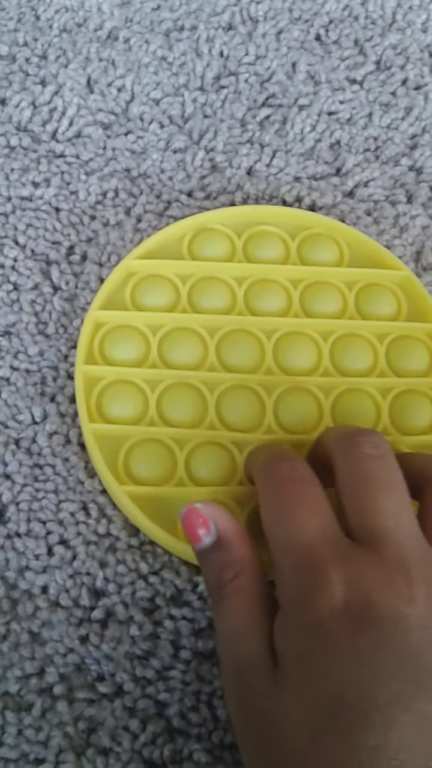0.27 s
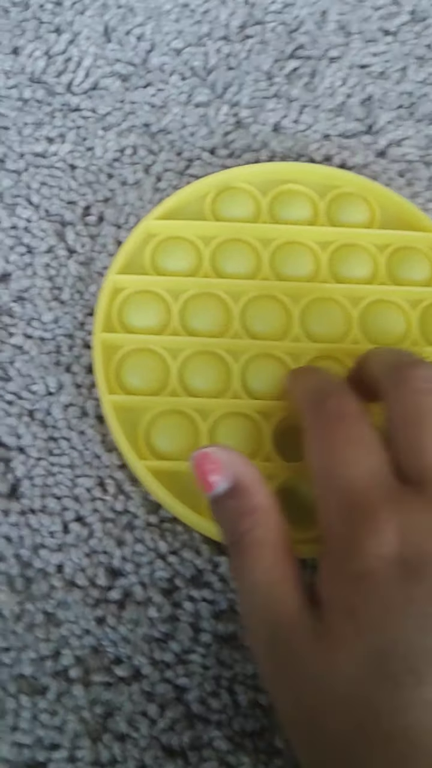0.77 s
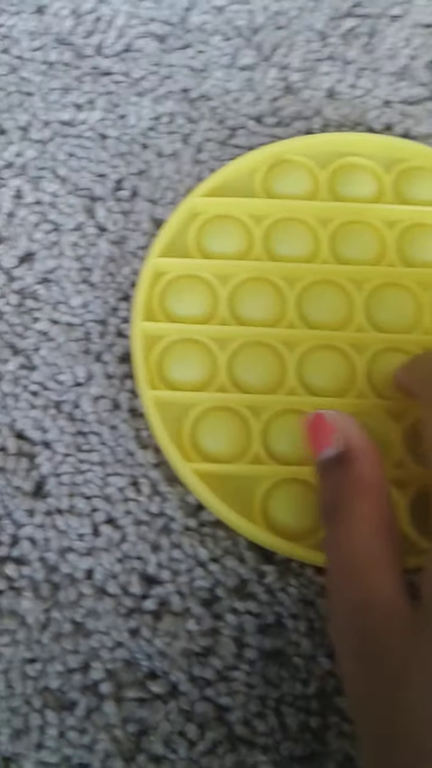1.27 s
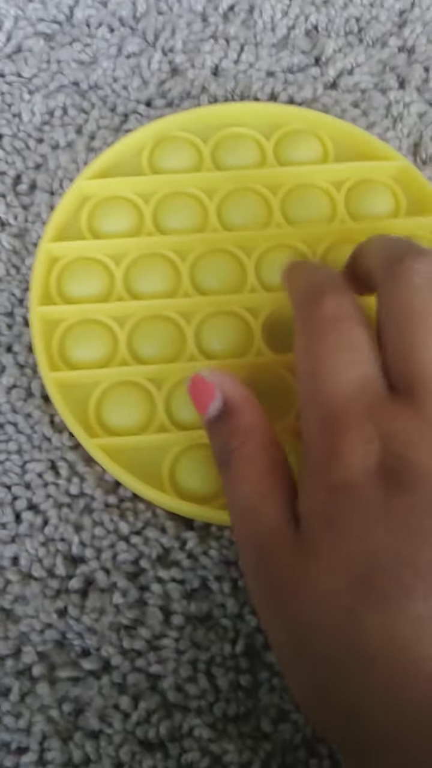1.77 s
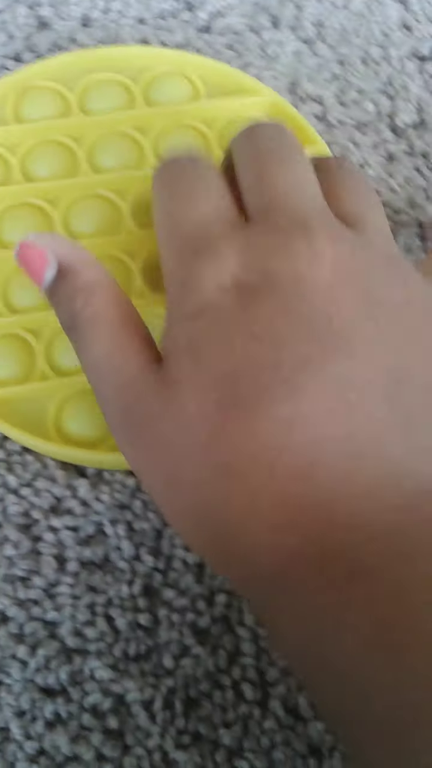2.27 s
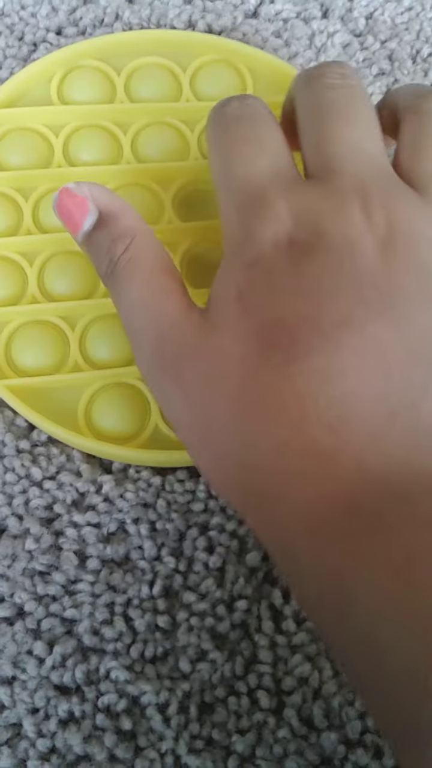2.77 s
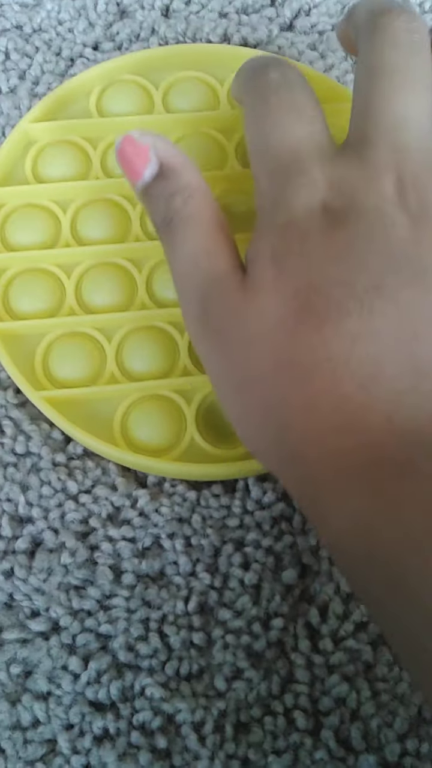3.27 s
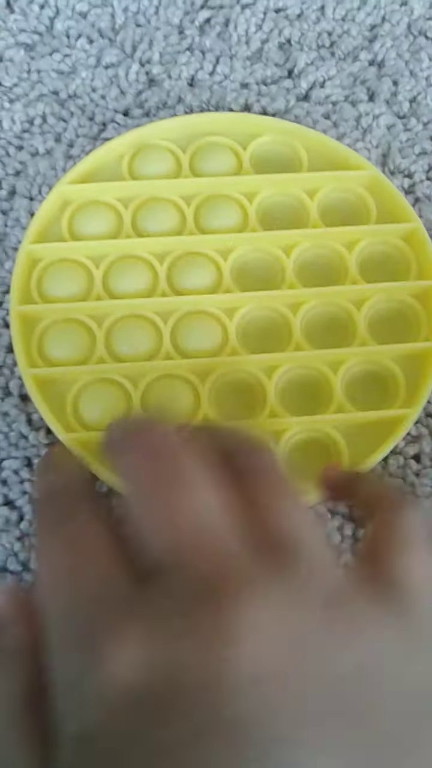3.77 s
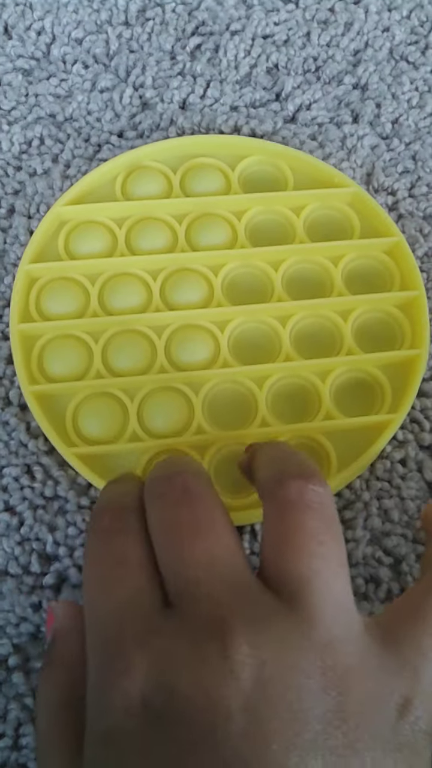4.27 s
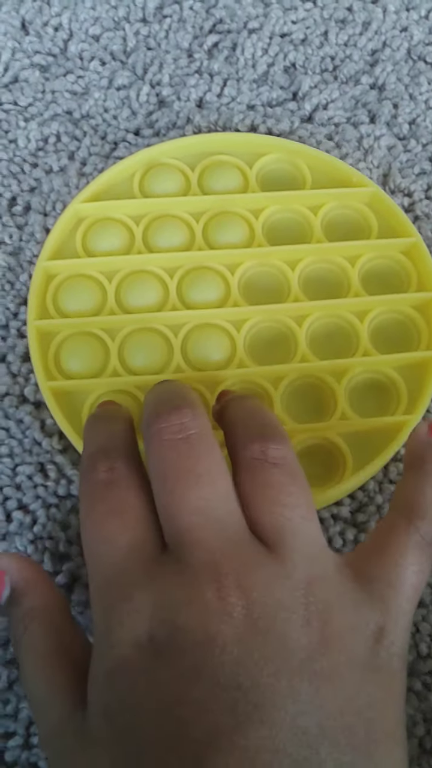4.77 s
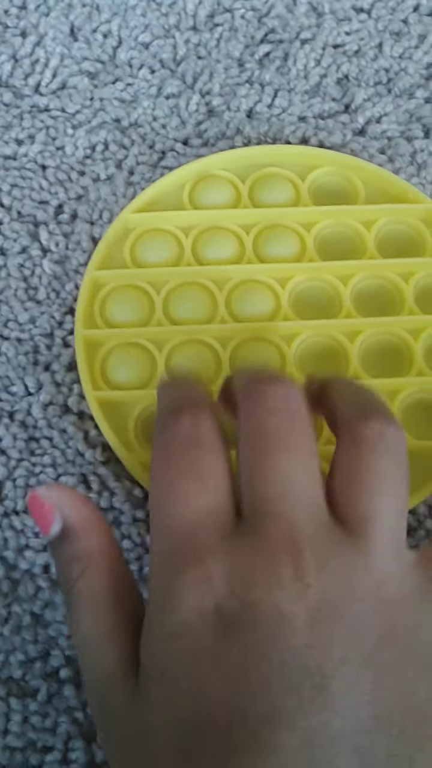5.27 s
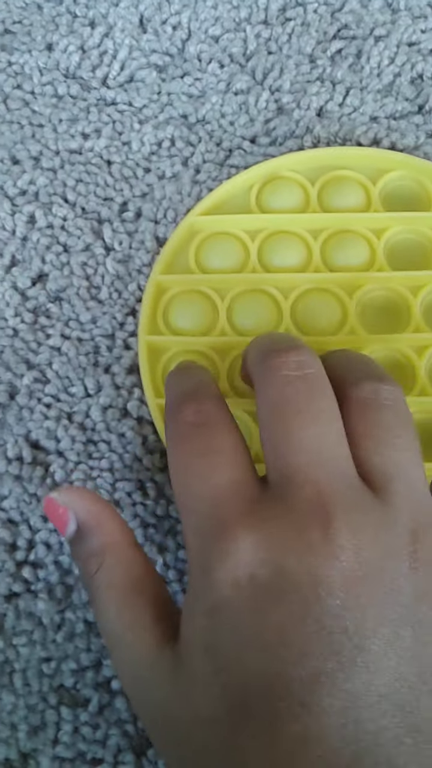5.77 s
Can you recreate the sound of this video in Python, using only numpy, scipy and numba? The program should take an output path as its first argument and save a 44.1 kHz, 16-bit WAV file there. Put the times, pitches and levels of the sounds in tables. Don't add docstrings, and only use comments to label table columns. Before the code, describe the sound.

Silicone bubbles snap inward in seven quick presses, sharp hollow pops over faint low rumble, skin hissing and ticking on rubber in a small room.

```python
import sys
import numpy as np
from scipy import signal
from scipy.io import wavfile
from scipy.ndimage import uniform_filter1d
from numba import njit

SR = 44100
rng = np.random.default_rng(int(sys.argv[2]) if len(sys.argv) > 2 else 0)


def ratio_of_db(decibels):
    return 10 ** (np.asarray(decibels, float) / 20)


def log_audio(samples):
    frames = np.atleast_2d(samples).T
    limited = np.clip(frames, -1, 1)
    pcm = np.round(limited * 32767).astype(np.int16)
    wavfile.write(sys.argv[1], SR, pcm)


N = 265923

# (time [s], level [dB])
RUMBLE_LEVEL = [
    (0, -55.5),
    (.4, -50),
    (1.0, -47.5),
    (1.3, -53),
    (1.7, -54),
    (1.8, -66),
    (2.6, -65.5),
    (4.0, -61.5),
    (6.03, -66),
]
# (time [s], lift [dB])
RUMBLE_SURGES = [(0.131, 7.5), (.27, 5), (.46, 2), (.55, 8), (0.769, 11.5), (.89, 3), (1.079, 5),
                 (1.18, 0.5), (1.6, 7), (2.029, 10), (2.25, 16), (3.01, 10), (3.211, 9), (3.77, 8),
                 (4.75, 3.5), (5.15, 10.5)]
# (frequency [Hz], width [Hz], level [dB])
RUMBLE_BANDS = [(115.5, 25, 0), (153.7, 17, -10.5), (86.9, 30, -11.5), (55.13, 20, -31)]
# (frequency [Hz], density [dB per Hz])
AIR_SPECTRUM = [(198, -15), (270, -15), (434, -21.5), (560, -16), (760, -27.5), (1540, -34), (2540, -41.5),
                (4400, -51.5)]
# (frequency [Hz], width [Hz], rms level [dB])
HOUSE_DRONES = [(47.9, 9.8, -81.5), (61.3, 22, -72), (88.2, 40, -69.5), (180.5, 50, -71.5),
                (552.5, 85, -73)]
# (start [s], length [s], hiss [dB], hiss centre [Hz], dull scrape [dB])
SKIN_SLIDES = [(0.0, .31, -60, 6940, -84), (0.325, 0.24, -70, 6260, -70), (0.628, 0.095, -64, 7310, -74),
               (0.703, 0.18, -60.5, 6300, -80), (0.823, 0.11, -61, 7160, -80),
               (0.897, 0.3, -54.5, 7690, -77), (1.218, 0.052, -72, 7620, -88), (1.42, .25, -66, 6444, -91),
               (1.783, 0.035, -76, 7500, -88.5), (1.936, 0.14, -57, 7460, -83),
               (2.028, .33, -58, 6350, -79.5), (2.616, 0.17, -81, 7275, -94),
               (2.818, 0.18, -66.5, 6506, -84), (3.178, 0.049, -77, 6500, -78),
               (3.288, 0.28, -66, 6500, -85), (3.609, 0.29, -47.5, 6300, -58.5),
               (3.85, .2, -74.5, 6500, -78.5), (4.043, 0.1876, -72, 5997, -75.5),
               (4.736, 0.071, -77.5, 7600, -87), (4.873, 0.21, -78, 6500, -86),
               (5.086, 0.1126, -70, 6000, -68), (5.211, .07, -69, 7500, -95), (5.525, 0.23, -83, 6220, -81),
               (5.88, 0.47, -73.5, 6540, -87)]
# (time [s], peak [dB], frequency [Hz], top-end spit [dB])
SKIN_TICKS = [(0.0493, -58, 8550, -22), (0.0642, -52.5, 6900, -30), (0.0867, -70, 7420, -24),
              (0.1062, -58, 7870, -24.5), (0.1262, -50, 6800, -28), (0.357, -50.5, 8000, -28),
              (0.4759, -40, 6300, -14), (0.7237, -50, 7100, -36), (0.839, -45, 8200, -26),
              (1.2341, -62, 7500, -26), (1.7923, -65, 8480, -20), (1.8043, -71, 7330, -15),
              (1.8185, -52.5, 7760, -18), (1.9645, -47.5, 7090, -24), (2.6718, -67, 6750, -17.5),
              (3.5558, -63.5, 5870, -27.5), (4.4308, -62.5, 6890, -17), (4.895, -52.5, 7740, -32),
              (4.9062, -61, 6513, -19), (4.96, -66, 7500, -26.5), (4.995, -68, 6800, -25),
              (5.228, -49, 6570, -13), (5.2764, -64, 6170, -17)]
# (time [s], level [dB], centre [Hz])
PRESS_RUSTLES = [(.35, -51.5, 1600), (1.57, -51.5, 1725), (2.211, -51, 2030), (2.949, -56, 1900),
                 (3.48, -80, 2000), (4.48, -61.5, 1500), (5.11, -67, 1450)]
# (time [s], peak [dB], dome [Hz], air pocket [dB], upper modes [dB])
DOME_POPS = [(0.33829, -35.8, 959, -10, -30), (0.34312, -16.9, 1012, -5, -12),
             (0.34872, -20.2, 1030, -3, -6), (0.35617, -19.7, 956, -3, -10), (1.51839, -33.6, 1015, 5, -40),
             (1.52826, -28.6, 1151, 15, -40), (1.53888, -13.7, 1099, -9, -19),
             (1.54153, -10.9, 1091, -7, -17), (1.5588, -12.8, 1116, -11, -18),
             (2.18528, -34.4, 890, 4, -40), (2.18795, -33.2, 780, 15, -35),
             (2.19314, -14.4, 1170, -10, -14), (2.20071, -12.5, 1138, -9, -15),
             (2.21837, -19.1, 994, -7, -18), (2.21929, -12.4, 1139, -7, -15),
             (2.92477, -17.4, 1174, -7, -15), (2.93472, -28.7, 1073, -1, -40),
             (2.93721, -9.9, 1169, -4, -7), (3.45224, -35.3, 1267, 10, -40), (3.47261, -18.4, 1271, -1, -8),
             (4.4324, -40.4, 1141, 15, -39), (4.46957, -20.1, 850, -17, -40),
             (5.10144, -20.1, 1056, -6, -13), (5.10742, -25.0, 1082, -6, -10)]
# (from [s], dome ring [turns], air pocket [Hz], 2nd mode [Hz], 3rd mode [Hz])
HAND_PRESSES = [
    (0.3, 3.34, 480, 1760, 3000),
    (1.5, 2.49, 370, 2320, 3450),
    (2.1, 2.63, 450, 2400, 3640),
    (2.9, 2.87, 450, 2540, 3060),
    (3.4, 3.12, 420, 2620, 3600),
    (4.4, 1.04, 340, 1850, 3740),
    (5.0, 2.64, 480, 1720, 3080),
]
# (tearing [dB], its treble [dB], treble centre [Hz], share sent to room [dB], lift of upper modes [dB])
FOLD_TEARS = [(-14, -27, 5270, -0.5, 3), (-18.5, -36.5, 6650, -0.5, 0.5), (-18, -28.5, 6070, -1.5, 2),
              (-19, -40, 6500, 0.5, 5.5), (-17.5, -41, 6300, -4.5, 6.5), (-14.5, -42, 6600, 2, 3.5),
              (-15.5, -27.5, 5500, 0, -4.5)]
THIRD_MODE_DB = [-3, -12.5, -7.5, -12.5, -9, 3, -3]
# (frequency [Hz], width [Hz], level [dB])
TEAR_COLOUR = [(611, 250, 11), (1690, 440, 6.5), (2475, 390, 0.5), (3610, 650, -11)]
FOLD_GRIT = rng.standard_normal((len(DOME_POPS), 800))
# (delay [ms], level [dB])
ROOM_ECHOES = [(4.5, -27), (13.6, -13.5), (14.8, -16.5), (18.3, -30.5), (22, -28.5)]
# (frequency [Hz], width [Hz], 60 dB decay [s], level [dB])
ROOM_TAIL = [(280.7, 75, 0.39, -40), (424.6, 250, 0.28, -41.5), (600, 220, 0.25, -33),
             (927, 570, .3, -38.5), (1112, 200, 0.39, -44.5), (1600, 510, 0.26, -36), (2000, 630, 0.3, -36),
             (2610, 900, 0.15, -44), (3474, 900, 0.51, -46), (6500, 3300, 0.35, -32.5)]
# (time [s], rms level [dB], frequency [Hz], width [Hz], 60 dB decay [s])
FAR_RINGS = [(3.80, -55.5, 264, 42, 0.39), (3.945, -60.5, 693, 74, 0.15), (5.37, -62.5, 958, 77, 0.61),
             (3.6, -69.5, 960, 55, .4), (5.36, -76, 1430, 54, 0.79), (5.39, -77, 1100, 70, 0.4),
             (5.68, -65, 565, 120, 0.95), (5.28, -65, 585, 65, .8), (5.75, -70.5, 1500, 560, 1.2),
             (5.82, -67, 900, 300, 0.7), (2.4, -63, 230, 17.8, 0.45), (5.36, -72.5, 1600, 2000, 0.65),
             (4.02, -66.5, 300, 40, 1.2), (4.4, -66, 257, 67, 0.46), (5.08, -54, 214, 72, 0.29)]


def level(x, db):
    return x * ratio_of_db(db) / np.sqrt(np.mean(x ** 2))


@njit
def svf(x, hz, width):
    y, low_state = np.empty(len(x)), 0.
    band_state = 0.
    for i in range(len(x)):
        g = np.tan(np.pi * hz[i] / SR)
        k = width / hz[i]
        v = (band_state + g * (x[i] - low_state)) / (1 + g * (g + k))
        band_state = 2 * v - band_state
        low_state += 2 * g * v
        y[i] = k * v
    return y


def band(x, hz, width):
    return svf(x, hz + np.zeros(len(x)), 1. * width)


def band_twice(x, hz, width):
    return band(band(x, hz, width), hz, width)


def noise(hz, width, size=N):
    return level(band_twice(rng.standard_normal(size), hz, width), 0)


def walk(rate):
    hold = int(SR / rate)
    steps = np.repeat(rng.standard_normal(N // hold + 1), hold)
    return 1.8 * uniform_filter1d(uniform_filter1d(steps, hold), hold)[:N]


def rumble_swing():
    t = np.arange(N) / SR
    surge_s = 0.031
    time, db = np.transpose(RUMBLE_LEVEL)
    surges = sum(lift * np.exp(-((t - s) / surge_s) ** 2) for s, lift in RUMBLE_SURGES)
    return np.interp(t, time, db) + surges


def distant_rumble(rumble_db):
    rumble = sum(ratio_of_db(db + 1.2 * walk(28)) * noise(hz, w) for hz, w, db in RUMBLE_BANDS)
    return ratio_of_db(rumble_db) * level(rumble, -0.67)


def house_hum():
    hum = ratio_of_db(-74) * np.sin(2 * np.pi * 116 * np.arange(N) / SR)
    return hum + sum(ratio_of_db(db) * noise(hz, w) for hz, w, db in HOUSE_DRONES)


def suppressor_opening(rumble_db):
    t = np.arange(N) / SR
    slide, _, _, rustles = hand()
    busy = ratio_of_db(rumble_db + 46.5) + slide * ratio_of_db(59.5) + sum(rustles) * ratio_of_db(61)
    busy += sum((np.abs(t - s) < .012) * ratio_of_db(db + 48) for s, db, _, _ in SKIN_TICKS)
    steepness, lag_s = 1.4, .015
    return uniform_filter1d(1 / (1 + busy ** -steepness), int(lag_s * SR))


def room_air(rumble_db, opening):
    hz, db = np.transpose(AIR_SPECTRUM)
    air = 0
    for f in 200 * 2 ** (np.arange(15) / 3):
        density_db = np.interp(np.log(f), np.log(hz), db)
        air = air + ratio_of_db(density_db + 1.6 * walk(3)) * np.sqrt(f) * noise(f, f / 3)
    air_db = -69 + .3 * (rumble_db - RUMBLE_LEVEL[-1][1]) + 4.5 * opening
    return ratio_of_db(air_db) * level(air, 0.72)


def microphone_hiss(opening):
    treble = signal.butter(2, 5200, "hp", fs=SR, output="sos")
    hiss = signal.sosfilt(treble, rng.standard_normal(N))
    hiss_db = -87.5 + 14 * opening
    return ratio_of_db(hiss_db + .7 * walk(28)) * level(hiss, 4.0)


def background():
    rumble_db = rumble_swing()
    opening = suppressor_opening(rumble_db)
    out = distant_rumble(rumble_db) + house_hum()
    return out + room_air(rumble_db, opening) + microphone_hiss(opening)


def hand():
    t = np.arange(N) / SR
    hiss, scrape = ratio_of_db(-87), ratio_of_db(-83)
    pull = hiss * 6800
    for s, length, hiss_db, hz, scrape_db in SKIN_SLIDES:
        stroke = np.abs(np.sin(np.pi * np.clip((t - s) / length, 0, 1))) ** 1.16
        hiss = hiss + ratio_of_db(hiss_db) * stroke
        pull = pull + ratio_of_db(hiss_db) * stroke * hz
        scrape = scrape + ratio_of_db(scrape_db - 2.5) * stroke ** .35
    rustle_t60_s = 0.42
    rustles = [(t > s) * ratio_of_db(db - 60 * np.abs(t - s) / rustle_t60_s) for s, db, _ in PRESS_RUSTLES]
    return hiss, pull / hiss, scrape, rustles


def slides_and_rustles():
    slide, hz, scrape, rustles = hand()
    grains = rng.standard_normal(N) * ratio_of_db(2.1 * rng.exponential(size=N))
    hiss = 0.8 * level(band_twice(grains, hz, 2300), 0) + 0.3 * noise(6400, 1100)
    out = slide * ratio_of_db(1.2 * walk(45) - 8.0) * level(hiss, 0)
    dull = noise(1800, 1700) + .8 * noise(900, 800)
    out += scrape * ratio_of_db(.8 * walk(40)) * level(dull, 0)
    rustle = sum(gain * noise(centre, 900) for gain, (_, _, centre) in zip(rustles, PRESS_RUSTLES))
    return out + ratio_of_db(2.5 * walk(90)) * rustle


def unsticking_ticks():
    out = np.zeros(N)
    t = np.arange(400) / SR
    for s, db, hz, spit_db in SKIN_TICKS:
        snap = (1 + .4 * rng.standard_normal(len(t))) * ratio_of_db(-60 * t / .0002)
        tick = band_twice(snap, hz, 2700)
        tick += ratio_of_db(spit_db + 13.0) * band(snap, 16300, 7400)
        start = int(s * SR)
        out[start:start + len(t)] += ratio_of_db(db + 5.0) * tick / np.abs(tick).max()
    return out


def ring(ms, hz, ring_ms, load_ms, grip):
    early = ms < 0
    span = np.where(early, load_ms, ring_ms)
    shape = np.exp(-(np.abs(ms) / span) ** np.where(early, 2, grip))
    return shape * np.cos(2 * np.pi * hz * ms / 1000)


def tearing(grit, ms, tear_gain, treble_db, treble_hz, pocket_db):
    body = sum(ratio_of_db(db) * band(band_twice(grit, hz, 1.7 * w), hz, 1.7 * w) for hz, w, db in TEAR_COLOUR)
    crack = tear_gain * body + ratio_of_db(treble_db) * band_twice(grit, treble_hz, 1200)
    softness_db = 0.98 * max(pocket_db - 2.0, 0)
    return crack * ratio_of_db(9.5 - softness_db) * ring(ms, 0, 1.93, 0.43, 1.8)


def pops(shorten, away):
    out = np.zeros(N)
    open_back = signal.butter(3, 275, "hp", fs=SR, output="sos")
    press_starts = [row[0] for row in HAND_PRESSES]
    for (s, db, hz, pocket_db, second_db), grit in zip(DOME_POPS, FOLD_GRIT):
        press = np.searchsorted(press_starts, s) - 1
        _, turns, pocket_hz, second_hz, third_hz = HAND_PRESSES[press]
        tear_db, treble_db, treble_hz, room_db, lift_db = FOLD_TEARS[press]
        third_db = second_db + THIRD_MODE_DB[press]
        lift = ratio_of_db(away * lift_db)
        at = int(s * SR) + np.arange(-200, 600)
        ms = 1000 * (at / SR - s)
        pop = ring(ms, hz, shorten * turns * 1000 / hz, .53, 2.6)
        pop += ratio_of_db(pocket_db) * ring(ms, pocket_hz, 2.1, .3, 4)
        pop += ratio_of_db(-23) * ring(ms, .82 * hz, 8, .3, 2)
        pop += lift * ratio_of_db(second_db) * ring(ms, second_hz, 1.2, .45, 2)
        pop += lift * ratio_of_db(third_db) * ring(ms, third_hz, 1.2, .4, 2)
        pop = signal.sosfiltfilt(open_back, pop)
        crack = tearing(grit, ms, lift * ratio_of_db(tear_db), treble_db, treble_hz, pocket_db)
        out[at] += ratio_of_db(db + away * room_db) * (pop / pop.max() + crack)
    return out


def room(x):
    size = SR // 2
    t = np.arange(size) / SR
    early = np.zeros(size)
    for ms, db in ROOM_ECHOES:
        early[int(ms * SR / 1000)] = ratio_of_db(db)
    build = np.clip((t - .004) / 0.0117, 0, 1)
    tail = np.zeros(size)
    for hz, w, t60, db in ROOM_TAIL:
        tail += ratio_of_db(db) * noise(hz, w, size=size) * ratio_of_db(-60 * t / t60) * np.sqrt(w / SR)
    return signal.fftconvolve(x, band(early, 850, 670) + build * tail)[:N]


def other_room():
    out, t = np.zeros(N), np.arange(N) / SR
    for s, db, hz, w, t60 in FAR_RINGS:
        age = np.maximum(t - s, 0)
        rise = 0.073 * t60
        fade_db = -60 * np.maximum(age - rise, 0) / t60
        out += ratio_of_db(db + fade_db) * np.minimum(age / rise, 1) * noise(hz, w)
    return out


def scene():
    out = background() + slides_and_rustles() + unsticking_ticks() + pops(1, 0)
    out += room(pops(0.65, 0.79)) + other_room()
    return out[None]


def band_limit(x):
    return signal.sosfilt(signal.butter(12, 16370, fs=SR, output="sos"), x)


def record(dry):
    x = dry[0] - .5 * band(dry[0], 4720, 1600)
    x = signal.sosfilt(signal.ellip(10, .2, 60, 15850, fs=SR, output="sos"), x)
    return band_limit(x[None] - .0005)


dry = scene()
out = record(dry)
log_audio(out)
```